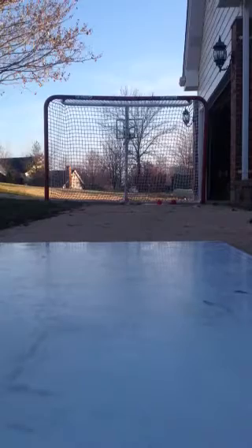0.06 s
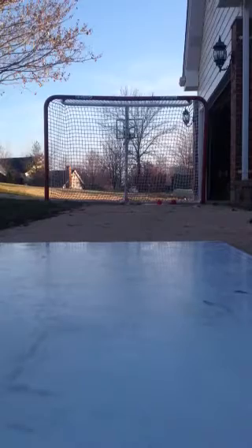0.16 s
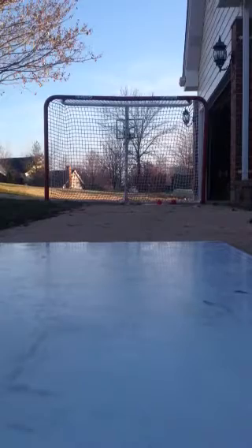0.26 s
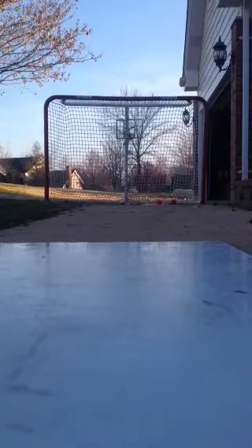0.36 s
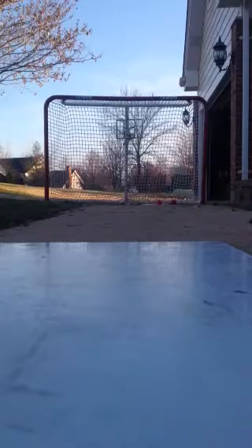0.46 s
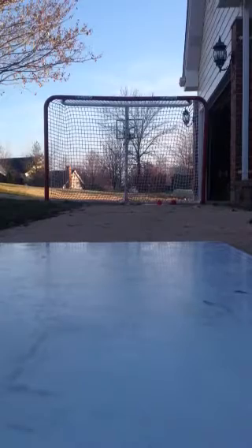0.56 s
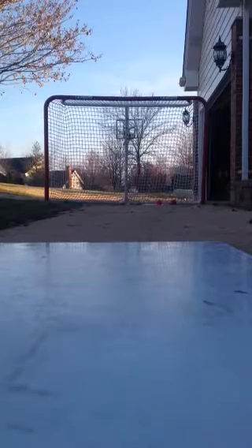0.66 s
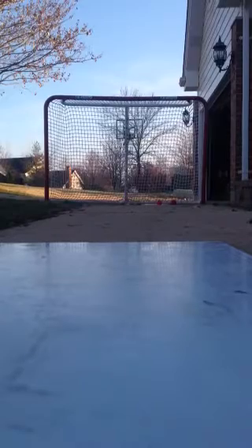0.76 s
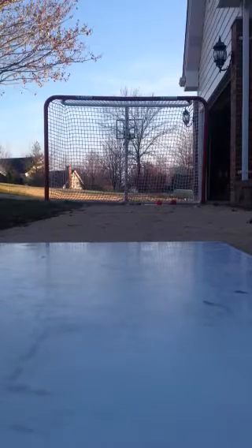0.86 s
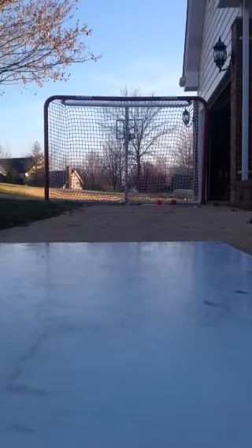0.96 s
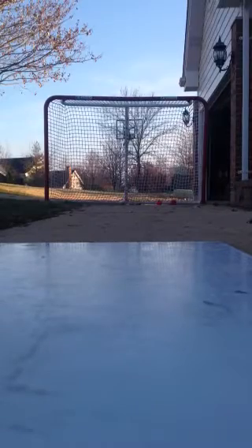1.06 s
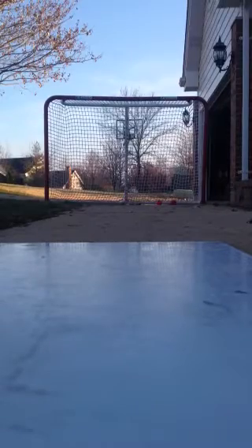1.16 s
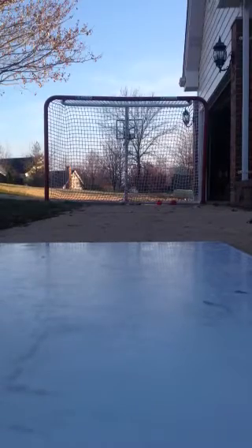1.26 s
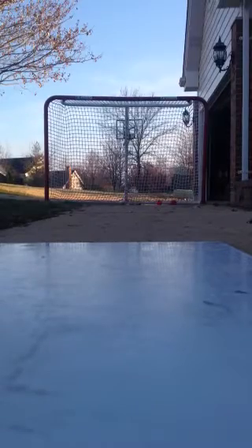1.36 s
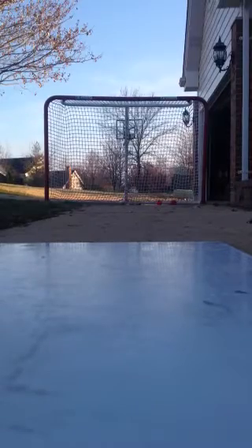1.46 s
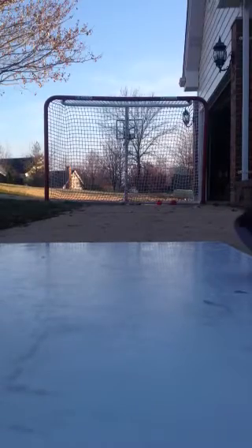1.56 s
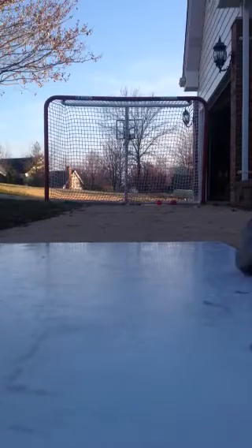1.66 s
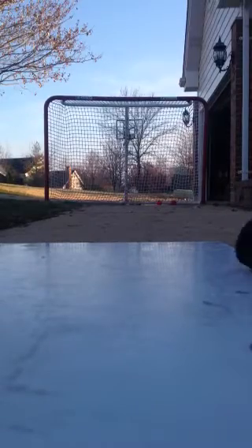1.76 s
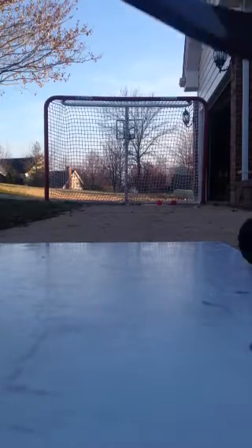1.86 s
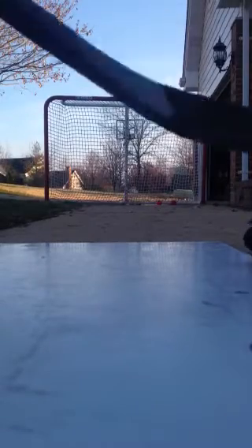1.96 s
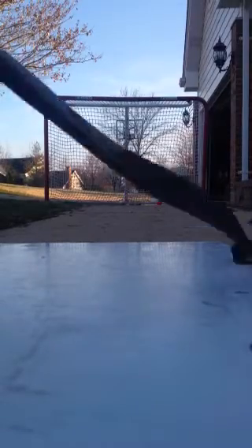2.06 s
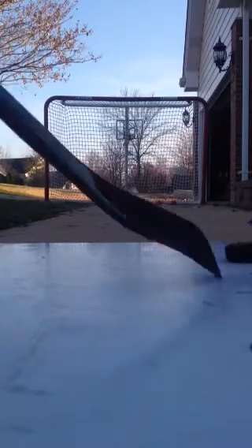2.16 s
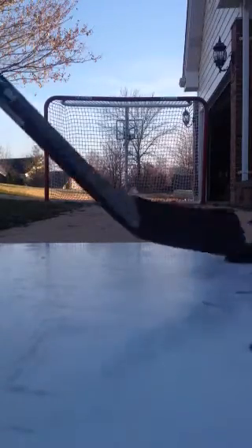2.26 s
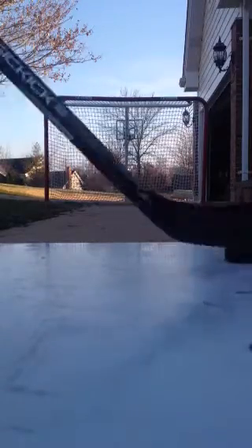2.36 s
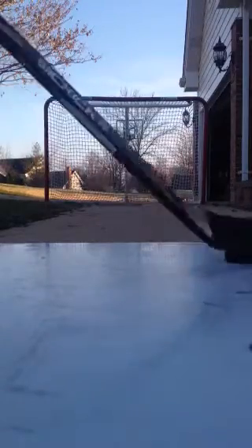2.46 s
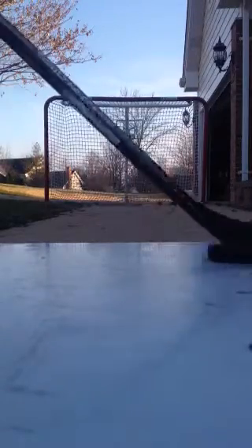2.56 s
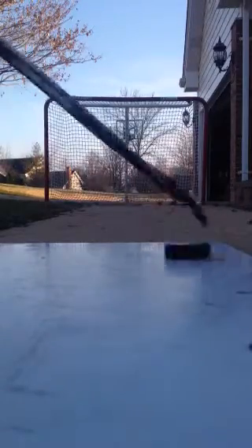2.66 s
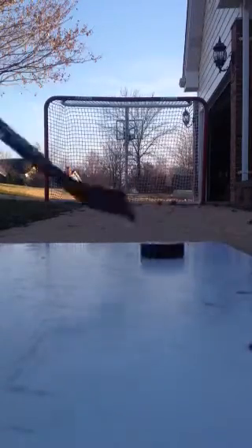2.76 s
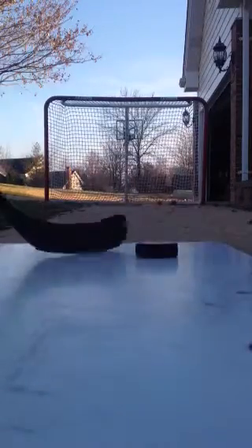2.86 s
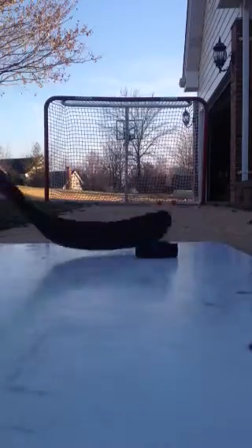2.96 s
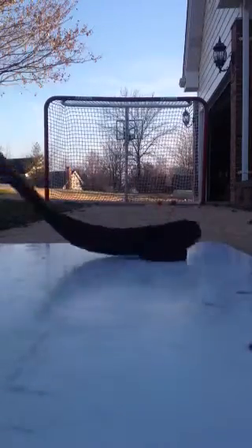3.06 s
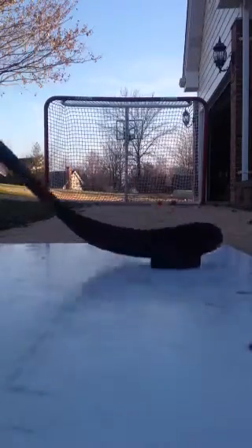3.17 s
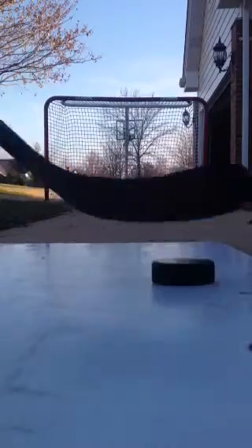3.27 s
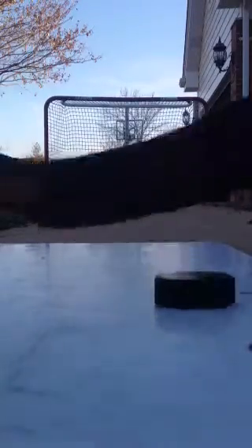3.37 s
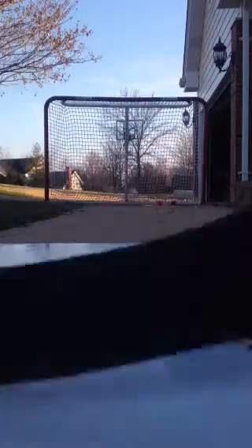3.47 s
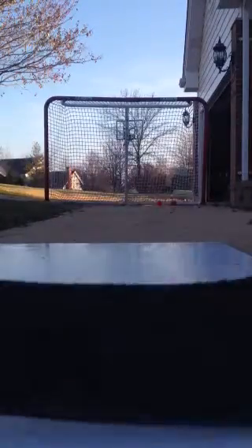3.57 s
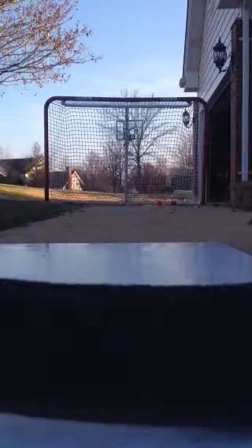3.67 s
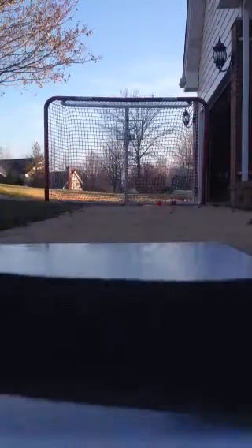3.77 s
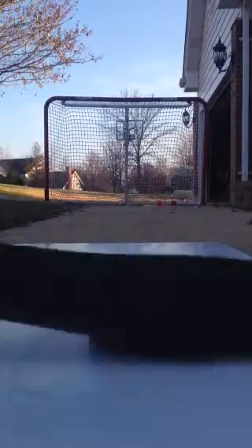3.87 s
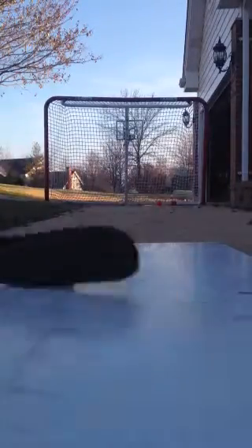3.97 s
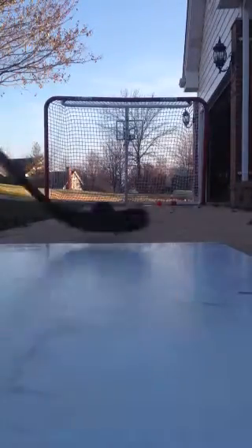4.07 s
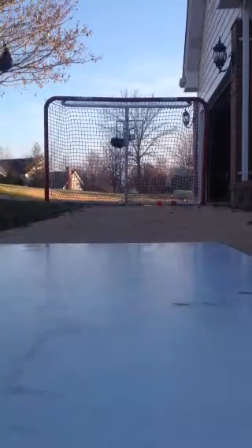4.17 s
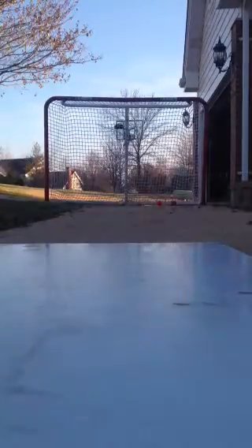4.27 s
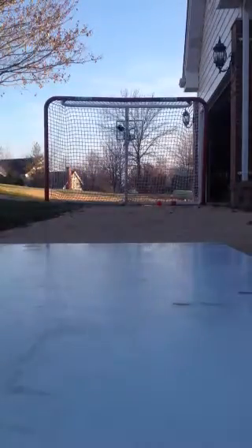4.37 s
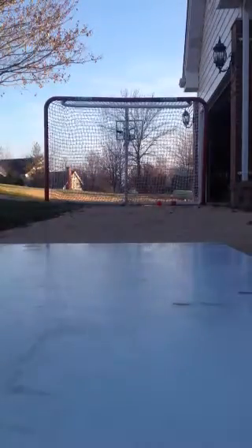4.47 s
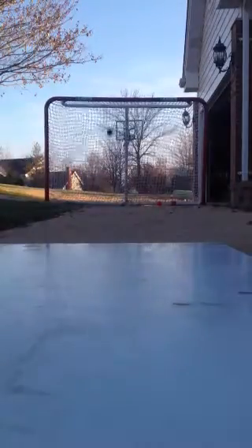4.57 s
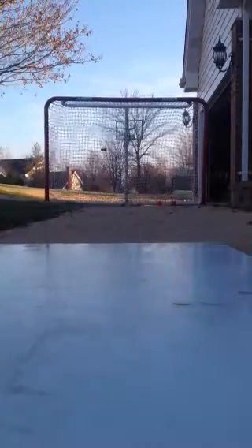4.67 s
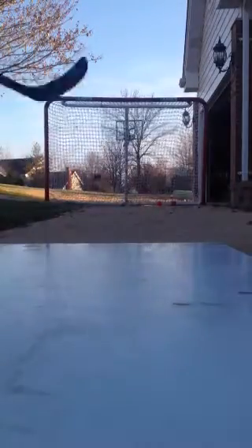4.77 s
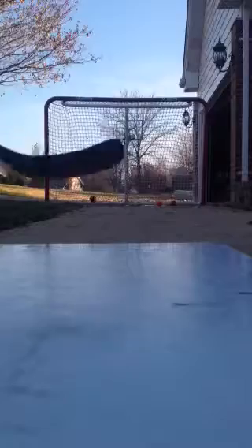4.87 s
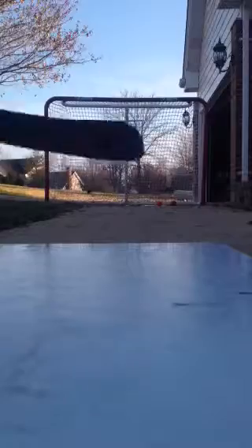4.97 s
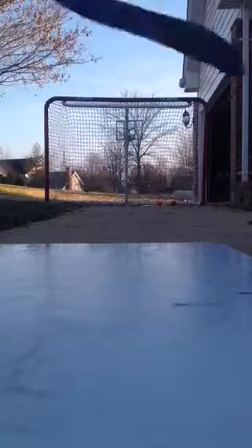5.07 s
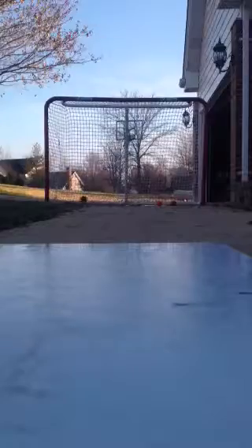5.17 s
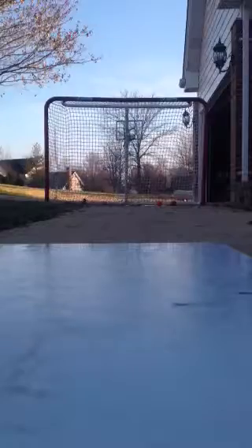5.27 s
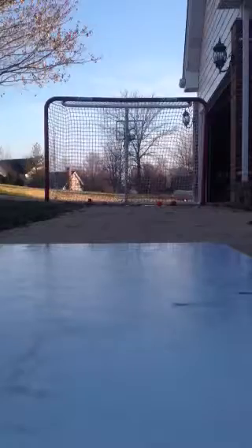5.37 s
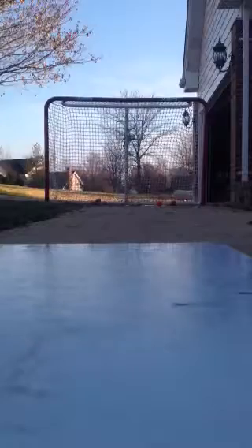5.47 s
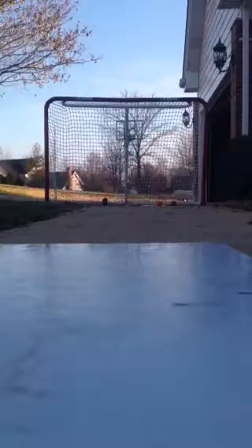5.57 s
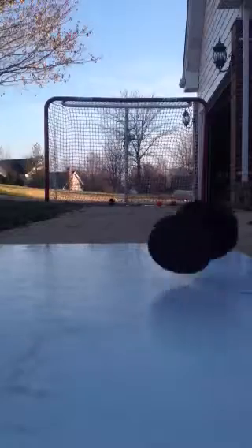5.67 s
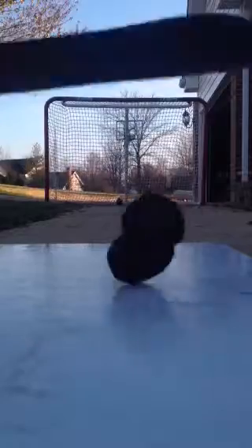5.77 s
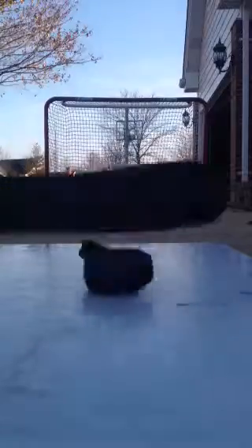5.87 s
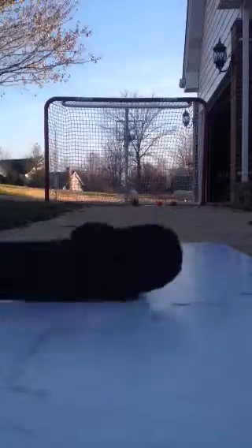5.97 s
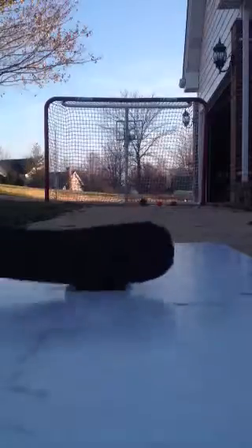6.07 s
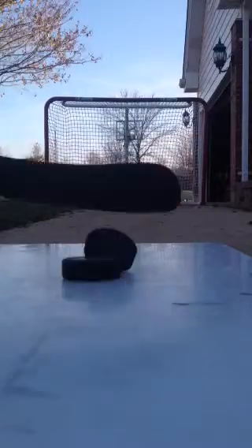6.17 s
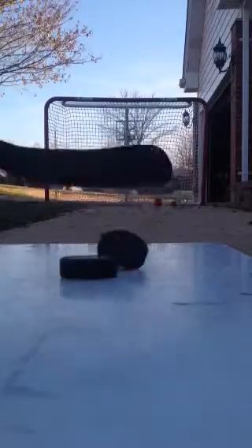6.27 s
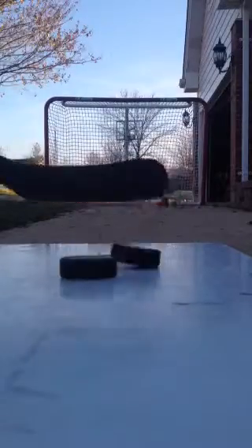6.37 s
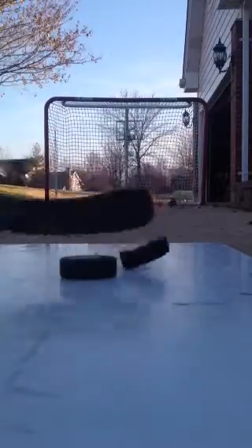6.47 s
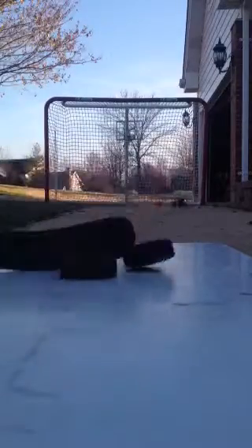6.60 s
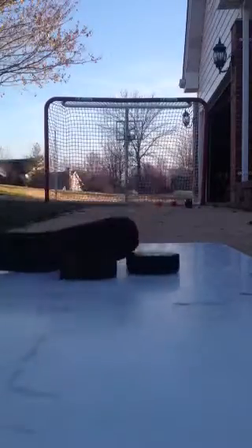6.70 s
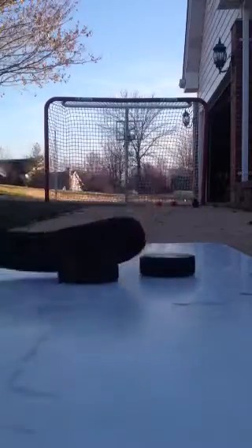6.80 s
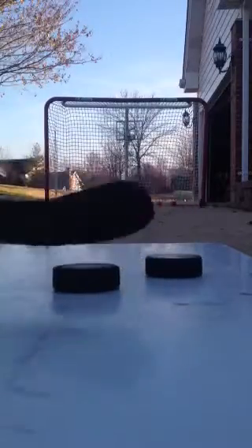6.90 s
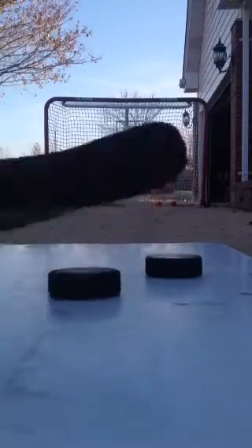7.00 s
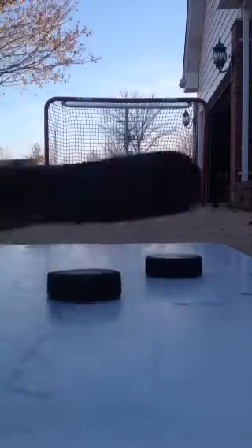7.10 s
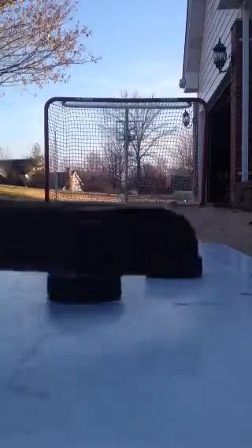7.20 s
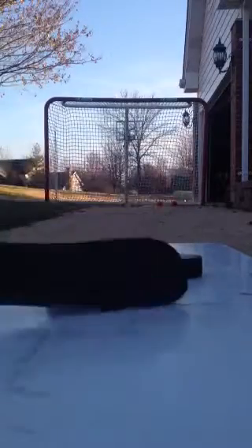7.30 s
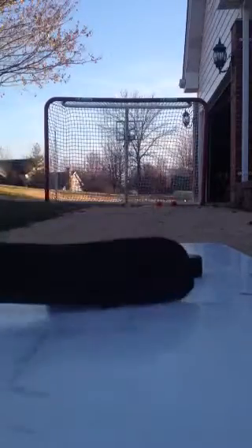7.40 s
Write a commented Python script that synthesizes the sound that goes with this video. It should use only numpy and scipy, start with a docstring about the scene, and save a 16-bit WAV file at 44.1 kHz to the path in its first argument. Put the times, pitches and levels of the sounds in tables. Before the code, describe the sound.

A hockey stick taps, scrapes and slaps pucks on a thin plastic pad outdoors, sharp dry cracks close up over faint neighbourhood hum.

```python
"""A hockey stick and pucks knock and rattle on a thin plastic pad in a driveway, right in front of a phone.
Each blow is a noisy click that rings damped pad modes, bends the whole pad and chatters on in clumps of noise.
Slides hiss, rub and rumble in stick-slip grains; thin wavering sines follow a shot into the goal.
The house front sends a short echo of smeared noise back over the filtered-noise hum of a quiet neighbourhood."""
import sys
import numpy as np
from scipy import signal
from scipy.fft import rfft, irfft
from scipy.io import wavfile
from scipy.ndimage import uniform_filter1d

SR = 44100
rng = np.random.default_rng(int(sys.argv[2]) if len(sys.argv) > 2 else 0)


def persist_wave(psi):
    """Save psi, clipped to +-1, as 16-bit WAV."""
    counts = np.round(np.clip(psi, -1, 1) * 32767).astype(np.int16)
    wavfile.write(sys.argv[1], SR, np.atleast_2d(counts).T)


N = 328104

# modes of pad and blade: (frequency [Hz], relative level [dB], t60 [s])
PAD_MODES = [(456, -20.5, 0.0067), (680, -20.5, 0.06), (840, 11, 0.011), (1020, 8, 0.013),
             (1315, 5.5, 0.017), (1470, 11.5, 0.01), (1806, 8, 0.018), (2070, 6, .009), (2139, 3, 0.0033),
             (2887, -3.5, 0.0033), (3405, 1, 0.023)]


def undb(db):
    """Decibels to amplitude factor."""
    return 10 ** (np.asarray(db) / 20)


def unit(x):
    """Scale to rms 1."""
    return x / np.sqrt(np.mean(x ** 2))


def band(x, lo_hz, hi_hz, order=2):
    """Butterworth band-pass."""
    edges_hz = [lo_hz, min(hi_hz, .45 * SR)]
    return signal.sosfilt(signal.butter(order, edges_hz, "band", fs=SR, output="sos"), x)


def grit(size, spread_db, grain_s):
    """Noise in clumps: a random level, now and then a big one, held for a grain."""
    k = max(int(grain_s * SR), 2)
    levels = undb(spread_db * rng.exponential(size=size // k + 1))
    clumps = np.repeat(levels, k)[:size]
    return unit(uniform_filter1d(clumps, k) * rng.standard_normal(size))


def ring(modes, t, scatter_db):
    """Damped sines whose levels and signs are drawn anew, as the place of a blow sets their shares."""
    hz, db, t60 = (column[:, None] for column in np.transpose(modes))
    sign = rng.choice([-1, 1], hz.shape)
    share = undb(db + scatter_db * rng.standard_normal(hz.shape)) * sign
    return (share * np.sin(2 * np.pi * hz * t) * 1000. ** (-t / t60)).sum(axis=0)


def add(out, s, x):
    """Mix x into out from time s."""
    i = int(s * SR)
    out[i:i + len(x)] += x[:len(out) - i]


def swell(start, fullest, end):
    """Gain that rises to 1 and falls away, rounded on top, silent outside."""
    edge_db, bend = -26.5, 1.89  # level at the ends before the lift-off; how rounded the top is
    lift = .15  # last share of the rise or fall, in which contact fades to nothing
    gain = np.zeros(N)
    span = np.arange(max(int(start * SR), 0), min(int(end * SR), N))
    away = np.abs(np.interp(span / SR, [start, fullest, end], [-1, 0, 1]))
    gain[span] = undb(edge_db * away ** bend) * np.minimum((1 - away) / lift, 1)
    return gain


def wander(rate):
    """Smooth random drift that changes about rate times a second, rms 1."""
    k = int(SR / rate)
    smooth = uniform_filter1d(rng.standard_normal(N), k)
    return unit(uniform_filter1d(smooth, k))


def air():
    """Steady far-off hum and hiss of the neighbourhood: noise shaped by a fixed spectrum."""
    # spectrum of the hum and hiss: (frequency [Hz], relative level per Hz [dB])
    spectrum = [(24, -15.5), (40, -11), (155, 3), (276, -7.5), (600, -5.5), (3300, -23), (6490, -33),
                (8130, -31.5), (14800, -22.5), (16000, -33.5)]
    level_db = -72.5  # rms, ahead of the microphone
    hz, db = np.transpose(spectrum)
    bin_hz = np.fft.rfftfreq(N, 1 / SR) + 1  # keeps the logarithm finite
    shape = undb(np.interp(np.log(bin_hz), np.log(hz), db))
    return undb(level_db) * unit(irfft(rfft(rng.standard_normal(N)) * shape, N))


def yard(x):
    """A few smeared wall echoes and a faint scattered tail, duller than the direct sound."""
    # returns from walls and garage: (delay [s], level before the common trim [dB])
    echoes = [(0.013, -19), (0.038, -23.5), (.054, -28.5), (0.091, -41.5)]
    tail_t60_s, tail_db, echo_trim_db = .5, -58, -25.5
    t = np.arange(SR // 2) / SR
    reply = undb(tail_db) * 1000. ** (-t / tail_t60_s) * (1 - np.exp(-t / 0.0024))
    for delay, db in echoes:
        smear = (t > delay) * np.exp(-np.abs(t - delay) / 0.0094)
        reply = reply + undb(db + echo_trim_db) * smear
    response = band(reply * rng.standard_normal(len(t)), 480, 4000, order=1)
    return signal.fftconvolve(x, response)[:N]


def frame():
    """Thin, slightly wavering gliding sines from the goal after the puck lands in it, and a faint squeak later."""
    # tones: (start [s], length [s], start pitch [Hz], end pitch [Hz], level before fades [dB], waver [share])
    tones = [(4.535, 0.043, 6790, 6670, -61, .003), (4.54, 0.17, 2410, 2330, -72, .006),
             (4.585, .07, 6600, 6400, -72, .004), (4.642, 0.034, 6850, 6750, -68, .003),
             (4.707, 0.038, 6660, 6560, -72, .003), (4.71, 0.17, 2320, 2286, -72, .003),
             (5.096, .11, 1730, 1940, -73, 0.026), (5.13, .1, 2820, 3100, -75, 0.033),
             (5.21, 0.069, 1750, 1850, -71, .03)]
    out = np.zeros(N)
    for s, length, start_hz, end_hz, db, waver in tones:
        t = np.linspace(0, 1, int(length * SR))  # share of the tone elapsed
        drift = 14 * uniform_filter1d(rng.standard_normal(len(t)), SR // 200)  # rms near 1
        hz = (start_hz + (end_hz - start_hz) * t) * (1 + waver * drift)
        fade = np.minimum(12 * t, 1) * (1 - t) ** 0.64
        add(out, s, undb(db) * fade * np.sin(2 * np.pi * np.cumsum(hz) / SR))
    return out


def squeak():
    """A narrow scratchy streak: a carrier whose pitch wanders and whose level flickers."""
    centre_hz, pitch_wander, width_hz, flicker_db = 5980, 0.066, 150, 4.5  # pitch_wander is a share
    phase = 2 * np.pi * np.cumsum(centre_hz * (1 + pitch_wander * wander(16))) / SR
    flicker = undb(flicker_db * wander(45))
    # two independent drifts in quadrature widen the line into a streak
    streak = wander(4 * width_hz) * np.cos(phase) + wander(4 * width_hz) * np.sin(phase)
    return unit(flicker * streak)


def slide():
    """Stick-slip grains shared by hiss, rub and sizzle; the rub also rings the pad,
    over rumble, changing background noise and wind."""
    # slides, before the trims of the mix:
    # (start [s], fullest [s], end [s], hiss [dB], rub minus hiss [dB], sizzle minus hiss [dB])
    strokes = [(0.23, 0.406, 0.53, -61.5, -15, -18), (1.542, 1.56, 1.75, -57.5, 8, -28),
               (2.092, 2.225, 2.36, -65, 6.5, -27), (2.517, 2.537, 2.59, -51.5, 4, -24),
               (2.518, 2.647, 2.943, -43, -6.5, -49), (3.036, 3.11, 3.37, -40, -12.5, -15),
               (3.215, 3.218, 3.27, -33, -22, -30.5), (3.34, 3.342, 3.41, -34, -18.5, -24.5),
               (3.45, 3.468, 3.5, -43, -12.5, -24), (3.09, 3.356, 3.6, -33, -23, -37),
               (3.35, 3.524, 3.54, -41.5, -5.5, -23), (3.5, 3.64, 3.725, -39.5, -11, -32),
               (3.73, 3.81, 3.92, -44.5, -13.5, -21.5), (3.786, 3.959, 4.1, -28.5, -15, -17),
               (3.947, 4.043, 4.1, -28.5, -9.5, -18), (4.056, 4.064, 4.13, -18.5, -26.5, -7),
               (4.077, 4.114, 4.3, -60.5, -6, -10), (4.48, 4.555, 4.76, -60, -8.5, -15.5),
               (4.526, 4.527, 4.57, -56.5, -20, 3.5), (4.86, 4.956, 5.05, -61.5, -9.5, -19),
               (5.7, 5.79, 5.86, -75, 3, -22), (6.024, 6.163, 6.3, -55.5, -1.5, -47),
               (6.398, 6.404, 6.46, -69.5, 7, -36), (6.531, 6.548, 6.6, -63.5, 2, -26),
               (6.7, 6.772, 6.86, -51, -4, -33), (6.747, 6.94, 7.16, -48.5, -5.5, -39),
               (7.288, 7.43, 7.6, -50.5, -28, -24.5)]
    # changing level of the background noise, before the trims:
    # (time [s], treble [dB], middle [dB], bass [dB])
    background = [(0, -73, -77.5, -73.5), (.6, -84, -75, -71.5), (1.099, -82, -77.5, -72),
                  (1.498, -83.5, -77, -75.5), (1.929, -88.5, -89, -82.5), (2.501, -82, -90, -87),
                  (3.741, -85, -80.5, -75), (4.25, -68.5, -79, -70), (4.47, -73, -85, -71.5),
                  (5.041, -77, -70, -71), (5.24, -73.5, -72.5, -67), (5.34, -94, -75.5, -71),
                  (5.54, -75, -72, -72.5), (5.65, -79.5, -74, -65), (6.35, -91, -88.5, -67.5),
                  (6.62, -93, -88.5, -74), (7.13, -79.5, -78.5, -76.5), (7.3, -67.5, -65.5, -72)]
    # low puffs of wind: (middle [s], length [s], level [dB])
    gusts = [(0.117, 0.082, -66), (0.384, .3, -63), (0.822, 0.21, -54.5), (4.941, 0.074, -51.5),
             (5.303, 0.047, -64)]
    surge_db = 1.45  # the grip comes and goes
    rumble_db = -21.5  # the pad rumbles with the rub
    hiss_trim_db, sizzle_trim_db, squeak_db = -14.5, -4.5, -6  # squeak is against the hiss

    s, *columns = np.transpose(background)
    hiss, rub, rumble = (undb(np.interp(np.arange(N) / SR, s, column)) for column in columns)
    sizzle = np.zeros(N)
    for start, fullest, end, db, rub_db, sizzle_db in strokes:
        push = undb(db) * swell(start, fullest, end)
        hiss = hiss + push
        rub = rub + undb(rub_db) * push
        sizzle = sizzle + undb(sizzle_db) * push
        rumble = rumble + undb(rub_db + rumble_db) * push
    for middle, length, db in gusts:
        rumble = rumble + undb(db) * swell(middle - length / 2, middle, middle + length / 2)

    grains = grit(N, 1.3, .0015) * undb(surge_db * wander(70))
    body = signal.fftconvolve(grains, ring(PAD_MODES, np.arange(SR // 20) / SR, 0))[:N]
    rubbed = unit(unit(body) + 3.5 * unit(band(grains, 450, 4300)))
    hissing = unit(band(band(grains, 3700, 9400, order=1), 1400, 8400))
    hissing = hissing + undb(squeak_db) * squeak()
    sizzling = unit(band(grains, 6400, 9700) + 0.37 * band(grains, 16000, 19845))
    rumbling = unit(band(grit(N, 1.5, .015), 110, 380))
    return (undb(hiss_trim_db) * hiss * hissing + rub * rubbed
            + undb(sizzle_trim_db) * sizzle * sizzling + rumble * rumbling)


def blows():
    """A sharp first contact, then the loose pad chatters against the concrete and dies away."""
    # blows, levels before the trims of the parts: (time [s], crack [dB], thump minus crack [dB],
    # pad ring minus crack [dB], hardness [0-1], chatter t60 [s], at least 8 ms used)
    hits = [(.0005, -46, -2, 1, 0, 0.023), (.5549, -34.5, -26, -4, 0.11, 0.0067),
            (0.556, -49, 3, 16.5, 0.66, 0.016), (1.225, -48.5, -30, 8.5, 0.08, 0.034),
            (1.2283, -47.5, -3, 7, 0.26, 0.012), (1.5489, -5.5, -18.5, -23.5, 0.27, 0.05),
            (1.5647, -18, -35, -9.5, 0.9, 0.14), (1.5949, -30.5, -31, -8.5, 0.8, 0.083),
            (1.617, -46, -42, 3, 0.2, 0.13), (1.6592, -21.5, -39, -16.5, 0.55, 0.063),
            (1.7562, -35.5, -24, -11, 0.58, 0.045), (1.771, -47, -15, -4, .55, 0.054),
            (1.7844, -42.5, -18, -7, 0.44, 0.071), (1.8678, -53.5, -17, -5.5, 0.52, 0.094),
            (2.018, -73, 5, 0, 0, 0.057), (2.0476, -33.5, -47, -8.5, 0.3, 0.098),
            (2.089, -22.5, -40, -6, 1, 0.1), (2.1148, -40, -17, -4, 0, 0.14),
            (2.1439, -47.5, -21, 1, 0.24, 0.17), (2.1669, -34.5, -42, -8, .1, 0.12),
            (2.1897, -21, -45, -11, 0.42, 0.089), (2.2016, -37, -30, -0.5, 0.57, 0.3),
            (2.238, -26, -39, -14.5, 0, 0.19), (2.254, -29, -24, -4, 0.6, 0.1),
            (2.2902, -28.5, -30, -8, 0.26, 0.091), (2.5263, -37, -20, -6.5, 0.55, 0.096),
            (2.5549, -39.5, -23, -3, 0.6, .04), (2.6828, -24.5, -36, -8.5, 0.57, 0.047),
            (2.9019, -13, -43, -10, 0.5, 0.052), (2.9126, -16.5, -47, -12.5, 0.4, 0.13),
            (2.9227, -21.5, -24, -10, 0.55, 0.08), (3.0534, -28, -12, 1, 0, 0.096),
            (3.137, -36.5, -38, -3, 0.8, 0.063), (3.1741, -34.5, -37, -19.5, 0.3, 0.065),
            (3.2747, -22, -35.5, -10.5, 0.79, .14), (3.5373, -13, -28, -6, 0.29, 0.11),
            (3.5445, -19, -22.5, -26, .3, 0.23), (3.6682, -39, 5, 8.5, 0, 0.058),
            (3.7987, -39.5, -29, -25, 0.6, .06), (3.8883, -27.5, -55.5, -35, .55, .08),
            (3.937, -18.5, -62, -45, 0.7, 0.093), (3.9555, -20.5, -44.5, -26.5, .95, 0.14),
            (4.0048, -19.5, -34, -17.5, 0.6, 0.041), (4.0254, -11, -30, -6.5, 0.41, 0.082),
            (4.074, -20, -39.5, -21, 1, 0.073), (4.0853, -15, -44.5, -19.5, 0.77, 0.12),
            (4.1466, -38.5, -10, 0, 0, 0.029), (4.1774, -53.5, 7, -7, 0.1, 0.043),
            (4.511, -46.5, -21, -14, 0.9, 0.13), (4.5363, -39, -27, -29, 0.26, 0.079),
            (4.642, -50, -19, -30, .55, .08), (4.844, -48.5, -34.5, -21, 0.6, 0.048),
            (4.9144, -34, -6, -15.5, 0.14, 0.019), (5.079, -61.5, -6, 1, 0.5, .06),
            (5.2646, -59.5, 9.5, 1, 0.39, 0.069), (5.4177, -22, -18, -8.5, 0.41, 0.043),
            (5.4491, -43, -6, -2.5, 0.3, .039), (5.6683, -6.5, -14, -13.5, 0.5, 0.093),
            (5.671, -8, -11.5, -11.5, 0.46, 0.047), (5.6854, -11.5, -31.5, -14, .9, 0.17),
            (5.7055, -23.5, -34.5, -12.5, 0.98, 0.088), (5.759, -36, -32, -5, 0, 0.042),
            (5.7658, -38, -21, -6.5, 0.1, 0.19), (5.884, -17.5, -35, -9, 0.57, 0.094),
            (5.8993, -23, -47, -13, 0.5, 0.09), (5.9078, -27.5, -34, -10.5, 0.14, 0.16),
            (5.9912, -44.5, -4, 14.5, 0.08, 0.0096), (6.008, -44.5, -28, -2, 0, 0.093),
            (6.0255, -28.5, -30, -5.5, 0.37, 0.077), (6.0346, -31.5, -16, -7, 0.03, 0.21),
            (6.0993, -48, -14, -9, 0, 0.096), (6.141, -47.5, -11, 0.5, 0, 0.21),
            (6.1996, -37, -41, -3, 0.05, 0.14), (6.2232, -38, -28, -11.5, 0.5, 0.034),
            (6.2787, -37.5, -28, -5.5, 0.24, 0.1), (6.4127, -41, -28, -6.5, 0.36, 0.085),
            (6.4211, -50, -23, 0, 0, 0.071), (6.5454, -51, -24, -5, 0.05, .058),
            (6.552, -44.5, -28, -0.5, 0, 0.18), (6.6362, -32.5, -40, -4.5, 0.5, 0.047),
            (6.6404, -21, -31, -10, .62, 0.21), (6.685, -19, -28, -6.5, 0.53, 0.071),
            (6.7006, -29.5, -43, -6.5, 0, 0.26), (6.7837, -45, 4.5, 10, 0, 0.076),
            (7.3229, -27.5, -17, -5.5, 0.09, 0.15)]
    # the pad's slow bending: (frequency [Hz], relative level [dB], t60 [s])
    flex_modes = [(95, -11, 0.018), (157, -7.5, 0.046), (209, -7, 0.046), (278, 3, 0.01)]
    chatter_db = -5.5  # gain of the rattle against the first contact
    crack_trim_db, thump_trim_db, pad_trim_db = -14, -3, -2.5
    crack_t60_s = 0.19  # extra decay: the treble of the chatter dies sooner
    # top treble against the crack of a soft 0 dB blow; harder is brighter, louder gains less sizzle than crack
    sizzle_db, sizzle_per_hard_db, sizzle_growth = -65, 7, 0.37  # growth in dB per dB of crack

    out, t = np.zeros(N), np.arange(SR // 7) / SR
    head = SR // 100  # levels are set on the first 10 ms
    for s, db, thump_db, pad_db, hard, t60 in hits:
        contact = 1.4 * np.exp(-t / .00004)
        contact = contact + 0.6 * rng.standard_normal(len(t)) * np.exp(-t / 0.0019)
        chatter = grit(len(t), 3.2, .0014) * 1000. ** (-t / max(t60, .008))
        force = contact + undb(chatter_db) * chatter
        treble = force * 1000. ** (-t / crack_t60_s)
        crack = band(treble, 2800, 7500, order=3)
        sizzle = band(treble, 5700, 16000)

        # a soft contact reaches only the lower modes, a hard one the upper
        pad_hz = 450 * 6 ** np.clip(hard, 0, 1)
        modes = signal.fftconvolve(force, ring(PAD_MODES, t[:SR // 20], 2.8))[:len(t)]
        pad = band(unit(modes) + 2.2 * unit(band(force, 300, 4500)), pad_hz / 3, pad_hz * 3)

        # the whole pad bends a few milliseconds late
        thud = band(rng.standard_normal(len(t)), 70, 300) * 1000. ** (-t / 0.027)
        flex = unit(ring(flex_modes, t, 1.3)) + 0.33 * unit(thud)
        flex = flex * (1 - np.exp(-t / 0.0044))

        sizzle_gain_db = sizzle_db + sizzle_per_hard_db * hard + (sizzle_growth - 1) * db
        parts = [(crack, crack_trim_db), (flex, thump_db + thump_trim_db),
                 (pad, pad_db + pad_trim_db), (sizzle, sizzle_gain_db)]
        for part, gain_db in parts:
            add(out, s, undb(db + gain_db) * part / np.sqrt(np.mean(part[:head] ** 2)))
    return out


def scene():
    """Everything near the phone, its echoes and the background."""
    near = frame() + slide() + blows()
    return (near + yard(near) + air())[None]


def record(dry):
    """The microphone drops the bass and its port resonates in the treble; loud peaks are rounded, the top is cut."""
    low_cut_hz, top_hz = 130, 15600
    port_hz, port_width_hz, port_db = 6100, 1100, 11.5
    x = signal.sosfilt(signal.butter(2, low_cut_hz, "high", fs=SR, output="sos"), dry)
    b, a = signal.iirpeak(port_hz, port_hz / port_width_hz, fs=SR)
    x = x + (undb(port_db) - 1) * signal.lfilter(b, a, x)
    rounded = band(np.tanh(1.161 * x) / 1.1, 40, 19000)
    return signal.sosfilt(signal.ellip(8, .2, 70, top_hz, fs=SR, output="sos"), rounded)


dry = scene()
out = record(dry)
persist_wave(out)
```